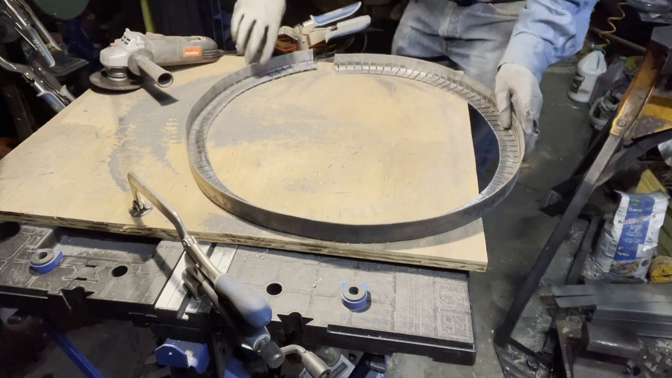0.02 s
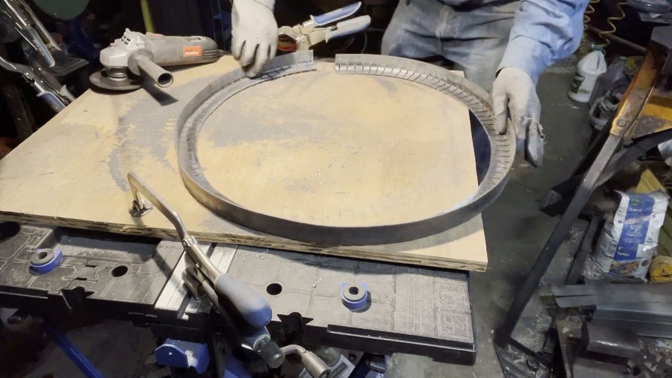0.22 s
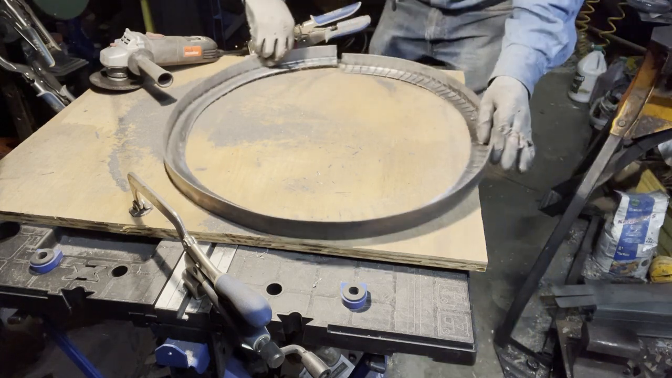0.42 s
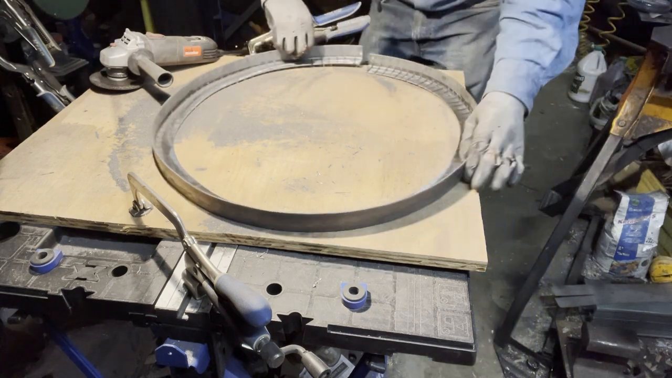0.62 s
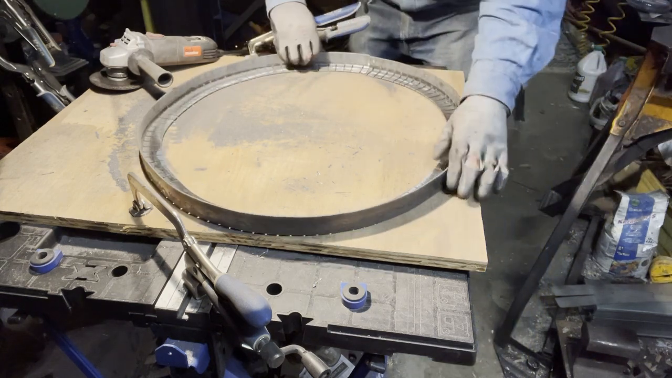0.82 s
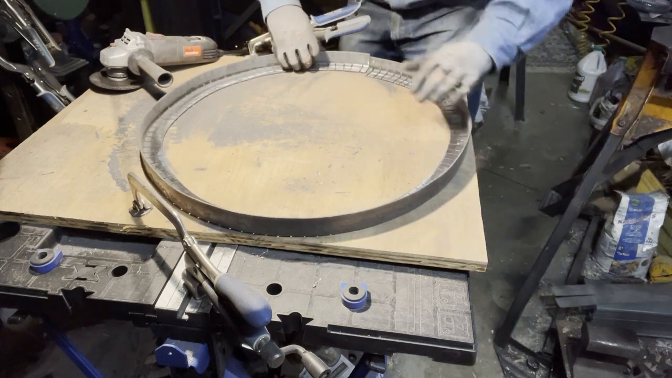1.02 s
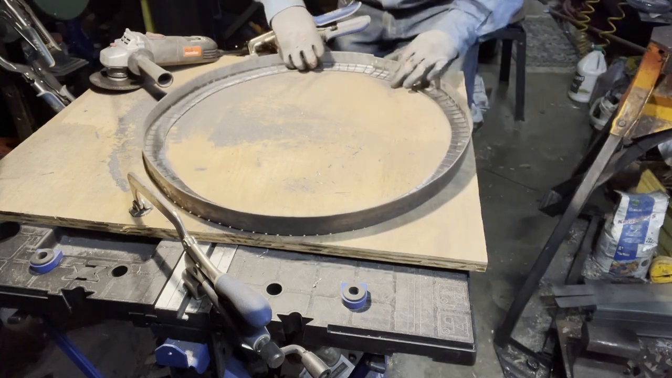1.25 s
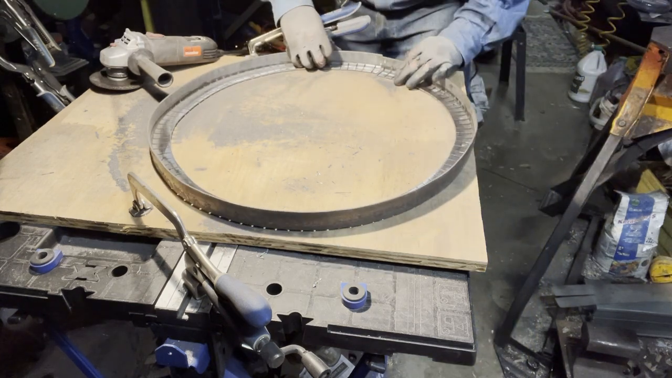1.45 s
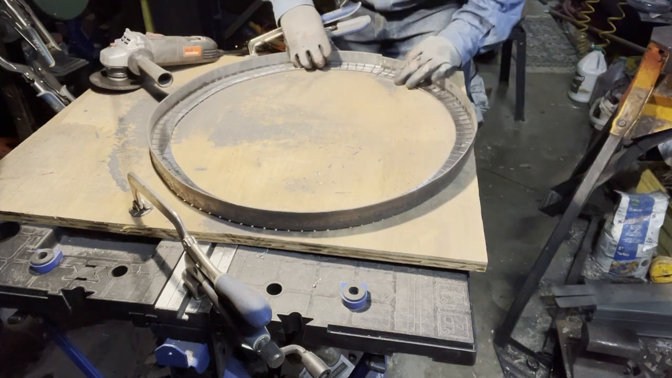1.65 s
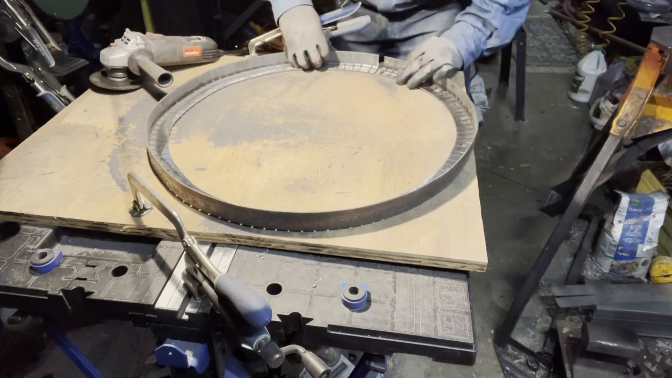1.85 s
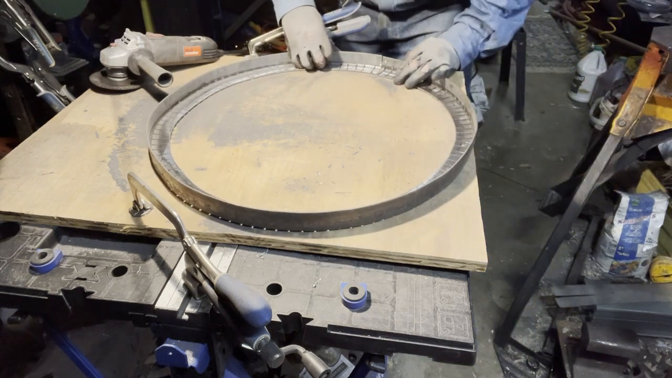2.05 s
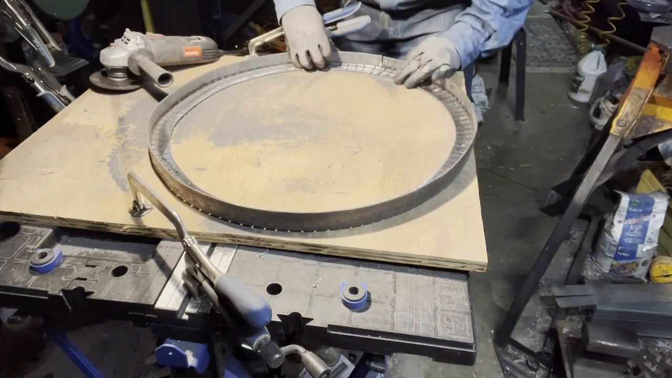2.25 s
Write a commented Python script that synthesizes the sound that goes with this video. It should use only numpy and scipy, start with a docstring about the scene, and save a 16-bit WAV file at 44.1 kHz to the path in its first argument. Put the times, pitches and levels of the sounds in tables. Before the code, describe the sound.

A bent steel band scrapes over a plywood bench in three short bouts, the first the longest. It thumps the board, ticks and rings briefly, with a gritty hiss. A low workshop hum lies underneath, heard close in stereo.

```python
"""Steel band scraped over plywood

A bent steel band is pushed in short strokes over a plywood bench, a step from a two-port microphone.
Grit under the rim catches and slips: it thumps the board, rings the steel and hisses. The rim knocks
and ticks; three short tones sound. Mains hum and low workshop rumble lie underneath."""
import sys
import numpy as np
from scipy import signal
from scipy.fft import rfft, irfft
from scipy.io import wavfile
from scipy.ndimage import uniform_filter1d

SR = 44100
rng = np.random.default_rng(int(sys.argv[2]) if len(sys.argv) > 2 else 0)


def wav_out(sig):
    """Save sig, one row per channel (or a flat mono array), as 16-bit PCM at SR to the path in sys.argv[1]."""
    wavfile.write(sys.argv[1], SR, np.round(np.clip(np.atleast_2d(sig).T, -1, 1) * 32767).astype(np.int16))


N = 101430
TIME_S = np.arange(N) / SR


def band():
    """Stick-slip, knocks and ticks drive board and steel; fine grit hisses."""
    # stroke envelopes (time [s], board drive [dB], groan drive [dB], steel drive [dB], grit drive [dB])
    strokes = [(0.0, -68, -65.5, -72, -70.5), (0.04, -90, -90, -86, -77), (0.091, -65.5, -64, -56, -70),
               (0.269, -31, -43, -38.5, -49), (0.36, -36, -46, -38.5, -52), (0.459, -40, -37.5, -31, -45),
               (0.558, -25, -32.5, -30, -35.5), (0.61, -37, -33.5, -33.5, -40.5),
               (0.65, -32.5, -33, -33, -41), (0.698, -23, -35.5, -32, -40.5),
               (0.75, -41, -39.5, -34, -49.5), (0.81, -35.5, -45.5, -38, -42),
               (0.829, -42, -42, -40, -46.5), (0.86, -37.5, -66, -41.5, -45.5), (0.909, -40, -50, -39, -47),
               (1.032, -61.5, -69.5, -54.5, -63.5), (1.299, -49.5, -56.5, -53.5, -56.5),
               (1.329, -30.5, -35.5, -33.5, -43), (1.39, -21.5, -32, -29.5, -42),
               (1.43, -26.5, -36, -33.5, -44.5), (1.52, -65, -94, -64, -78), (1.591, -70, -84, -66, -70),
               (1.628, -45, -48.5, -50.5, -70.5), (1.702, -64, -96, -69.5, -84), (1.75, -40, -44, -39, -56),
               (1.841, -30.5, -42, -39.5, -50), (1.902, -52.5, -71, -56, -66.5),
               (1.925, -49, -46, -40.5, -51.5), (1.96, -37, -52, -38, -46.5), (2.008, -28, -31, -31, -59),
               (2.068, -59, -85, -54, -102), (2.202, -80.5, -104, -83.5, -88), (2.232, -62, -63, -54, -72),
               (2.3, -59.5, -78, -62, -74)]
    # rim ticks (time [s], peak drive [dB], tap offset before scaling [dB])
    ticks = [(0.0812, -56.5, -8), (0.842, -17.5, -1), (0.9156, -26, -27), (1.0627, -41, -27),
             (1.0944, -45, -23), (1.1447, -49, -29), (1.2075, -37, 9), (1.5783, -54, 0),
             (1.6209, -56.5, 20.5), (1.7342, -31, -2), (2.2298, -53, -3)]
    # rim knocks (time [s], blow on board [dB], blow on steel [dB])
    knocks = [(.543, 1, -12), (0.635, -9, -33), (0.692, -7, -15), (.828, -11, -15), (.834, -1.5, -34),
              (.93, -12.5, -17), (1.131, -24, -50), (1.208, -14, -24.5), (1.429, -0.5, -9.5),
              (1.921, -37, -28.5), (1.991, -6, -3), (1.998, -3.5, -7.5)]
    stroke_s, *drives_db = np.transpose(strokes)
    board_db, groan_db, steel_db, grit_db = (np.interp(TIME_S, stroke_s, db) for db in drives_db)
    tick_s, tick_db, tap_offset_db = np.transpose(ticks)
    knock_s, on_board_db, on_steel_db = np.transpose(knocks)
    slips = grains(per_s=2500, scatter_db=1.5) * undb(1.5 * drift(39.37))
    fine = grains(per_s=20000, scatter_db=1)
    taps = fine * decays(tick_s, tick_db + 0.85 * tap_offset_db - 7, t60_s=0.02)
    spray = decays(tick_s, tick_db - 15.5, t60_s=0.12)
    snap = decays(tick_s, tick_db - 7, t60_s=0.012)
    steel_blows = blows(knock_s, on_steel_db)
    return (board(slips * undb(board_db - 1.5) + blows(knock_s, on_board_db) + 0.57 * taps)
            + groan(slips * undb(groan_db + 1.5) + undb(2) * steel_blows + 0.99 * taps)
            + steel(slips * undb(steel_db - 6.5) + taps, steel_blows)
            + grit(fine * (undb(grit_db) + spray + snap))
            + short_tones())


def board(force):
    """Plywood modes; their balance tilts as the rim bears on stiffer or freer parts."""
    # board modes (frequency [Hz], relative level [dB], t60 [s])
    modes = [(110, 2.5, 0.1), (154, -2, 0.045), (180.3, 2, 0.059), (231, -9, 0.33), (287, -0.5, 0.048),
             (341, 3, 0.099), (379.6, 0.5, 0.076), (440, -10.5, 0.061), (480.6, -6.5, 0.063),
             (574, -6.5, 0.023)]
    # mode tilt (time [s], slope [dB/octave])
    tilt = [(.3, -1.5), (.65, 2), (.84, 1), (1.0, -11.5), (1.4, 0), (1.8, -1.5), (2.0, 5)]
    thump = ring(force, modes, np.interp(TIME_S, *np.transpose(tilt)))
    return signal.sosfilt(signal.butter(4, 98.7, "high", fs=SR, output="sos"), thump)


def groan(force):
    """The band, pressed on the board, groans near 800 Hz."""
    # pressed-band modes (frequency [Hz], relative level [dB], t60 [s])
    modes = [(784, 0.5, 0.13), (816, -1, 0.11), (857, -2.5, 0.041), (931, -2, 0.059)]
    return ring(force, modes)


def steel(push, knock):
    """Distinct steel modes over a dense, fast-decaying body."""
    # steel modes (frequency [Hz], relative level [dB], t60 [s])
    modes = [(1032.4, -8, 0.07), (1187, -14.5, 0.25), (1348, -8.5, 0.25), (1716, -2, 0.1),
             (1904, -11, 0.066), (2110, -7.5, 0.084), (2142, -5, 0.07), (2247, -4, 0.095),
             (2583, -9.5, 0.15), (2840, -13.5, 0.65), (3170, -12.5, 0.075), (3600, -29, 0.19),
             (4230, -11, 0.147), (4630, -11, 0.059)]
    # dense-mode spectrum (frequency [Hz], relative level [dB])
    spectrum = [(600, -35), (1000, -5.5), (1500, -4.5), (1900, -8), (2200, -1.5), (2700, -8), (3200, -13),
                (3800, -12.5), (5000, -30)]
    force = push + knock
    body = dense_modes(force, t60_s=0.034) + undb(3) * push
    return ring(force, modes) + undb(2.5) * colour(body, spectrum)


def grit(rub):
    """Fine grit hisses and rings the highest steel modes."""
    # hiss spectrum (frequency [Hz], relative level [dB])
    spectrum = [(2800, -16), (3800, -6), (6000, -1), (8000, -5), (12000, -7), (16000, -8)]
    # high steel modes (frequency [Hz], relative level [dB], t60 [s])
    modes = [(5081, -1, .12), (6120, -2, .05), (7503, -3, .1), (7798, -1, .1), (8700, -3, .06),
             (11200, -7, .15)]
    hiss = colour(rub + undb(-2.5) * dense_modes(rub, t60_s=0.039), spectrum)
    return hiss + undb(-11) * ring(rub, modes)


def short_tones():
    """Two brief squeals, and the steel ringing near 5 kHz after the tick at 0.84 s."""
    # short tones (start [s], length [s], frequency [Hz], level [dB])
    tones = [(.555, .055, 3230, -35), (.644, .028, 805, -16), (.842, .085, 5085, -41)]
    out = 0
    for start_s, length_s, hz, db in tones:
        progress = np.clip((TIME_S - start_s) / length_s, 0, 1)
        swell = np.sin(np.pi * progress ** 0.6) ** 2
        out += swell * undb(db + 3.1 * drift(118.5)) * wavering_sine(hz, depth=0.00346, per_s=92.1)
    return out


def shop():
    """Workshop rumble and faint hiss."""
    # noise spectrum (frequency [Hz], relative level [dB])
    spectrum = [(15, -34), (25, 12), (134, 0.5), (249, -20.5), (373, -24), (641, -59), (2840, -47),
                (3250, -85), (11300, -43.5), (16000, -89)]
    return undb(-49 + 0.54 * drift(8.1)) * colour(rng.standard_normal(N), spectrum)


def hum():
    """Mains hum, wavering in level and pitch."""
    rms = undb(-53 - 1.5 * drift(8.45))
    return np.sqrt(2) * rms * wavering_sine(hz=116.6, depth=0.00987, per_s=4.4)


def undb(db):
    return 10 ** (np.asarray(db) / 20)


def drift(per_s):
    """Smoothed random steps, spread near 1."""
    hold = int(SR / per_s)
    steps = np.repeat(rng.standard_normal(400), hold)[:N]
    return 1.3 * uniform_filter1d(uniform_filter1d(steps, hold), hold)


def wavering_sine(hz, depth, per_s):
    """Sine with random pitch drift."""
    return np.sin(2 * np.pi * np.cumsum(hz * (1 + depth * drift(per_s))) / SR)


def grains(per_s, scatter_db):
    """Random clicks of both signs, a few of them large; unit RMS."""
    chance, size, sign = rng.random((3, N))
    clicks = (chance < per_s / SR) * np.sign(sign - 0.5) * undb(-scatter_db * np.log(size + 1e-9))
    return clicks / np.sqrt(np.mean(clicks ** 2))


def decays(starts_s, peaks_db, t60_s):
    """Envelope of sudden onsets with exponential tails."""
    return sum((TIME_S >= start_s) * undb(db - 60 * np.maximum(TIME_S - start_s, 0) / t60_s)
               for start_s, db in zip(starts_s, peaks_db))


def blows(starts_s, levels_db, contact_s=0.0003):
    """One rounded force pulse per knock."""
    pulse = np.hanning(int(contact_s * SR) + 3)
    out = np.zeros(N)
    for start_s, db in zip(starts_s, levels_db):
        i = int(start_s * SR)
        out[i:i + len(pulse)] -= undb(db) * pulse / pulse.sum()
    return out


def ring(force, modes, tilt_db_per_octave=0, pivot_hz=260):
    """Two-pole resonators; each swells and fades as the contact point moves."""
    out = 0
    for hz, db, t60_s in modes:
        r, w = undb(-60 / (t60_s * SR)), 2 * np.pi * hz / SR
        drive = force * undb(db + tilt_db_per_octave * np.log2(hz / pivot_hz) + 2.2 * drift(12))
        out += 2 * np.sqrt(1 - r) * signal.lfilter([0, r * np.sin(w)], [1, -2 * r * np.cos(w), r * r], drive)
    return out / np.sqrt(sum(undb(db) ** 2 for _, db, _ in modes))


def dense_modes(force, t60_s):
    """Overlapping modes as a decaying noise response."""
    return convolve(force, rng.standard_normal(SR // 2) * undb(-60 * TIME_S[:SR // 2] / t60_s))


def colour(x, spectrum):
    """Minimum-phase filter shaped by (frequency [Hz], relative level [dB]) rows."""
    hz, db = np.transpose(spectrum)
    gain_db = np.interp(np.log(np.linspace(1, SR / 2, 4097)), np.log(hz), db)
    cepstrum = irfft(gain_db * np.log(10) / 20)
    cepstrum[1:4096] *= 2
    cepstrum[4097:] = 0
    return convolve(x, irfft(np.exp(rfft(cepstrum)))[:4096])


def convolve(x, response):
    """Convolution at unit power gain."""
    return signal.fftconvolve(x, response / np.sqrt(np.sum(response ** 2)))[:N]


def on_bins(table):
    """(frequency [Hz], value) rows interpolated onto the FFT bins."""
    hz, value = np.transpose(table)
    return np.interp(np.log(np.fft.rfftfreq(N, 1 / SR) + 1), np.log(hz + 1), value)


def scene():
    """Both ports hear a shared part, shifted in phase, and an unlike part from elsewhere on the rim."""
    # likeness of the ports (frequency [Hz], squared coherence [0-1])
    likeness = [(60, 1), (250, 0.76), (600, 0.04), (3100, 0.3), (5300, 0), (7000, 0.4), (9000, 0.99)]
    # left over right (frequency [Hz], level [dB])
    balance = [(60, 15), (110, 0), (200, 7), (380, 2.5), (700, -0.5), (1290, 0), (2380, 0), (4400, 2),
               (8120, -1), (15000, 0.5)]
    # left ahead of right (frequency [Hz], phase [rad])
    lead = [(0, 0), (600, .2), (1210, .8), (2070, -.7), (3270, -1.5), (4300, -5.2), (5340, -3), (8100, -.1),
            (9400, .1), (11400, 3.1), (12300, 3.2), (15000, 6.28)]
    coherence = np.sqrt(on_bins(likeness))
    mid = rfft(band() + shop() + hum()) * np.sqrt((1 + coherence) / 2)
    side = rfft(band() + shop()) * np.sqrt((1 - coherence) / 2)
    pan = np.exp(0.5j * on_bins(lead)) * undb(on_bins(balance) / 2)
    return np.array([irfft((mid + side) * pan, N), irfft((mid - side) / pan, N)])


def record(dry):
    """The recorder thins the deepest bass and cuts the top."""
    low_cut_hz, top_hz = 75, 15900
    thin = signal.sosfilt(signal.butter(2, low_cut_hz, "high", fs=SR, output="sos"), dry)
    return signal.sosfilt(signal.ellip(10, 0.2, 80, top_hz, fs=SR, output="sos"), thin)


dry = scene()
out = record(dry)
wav_out(out)
```